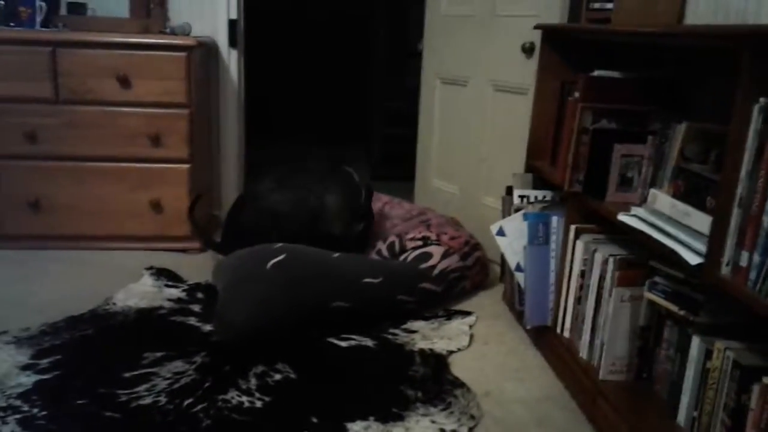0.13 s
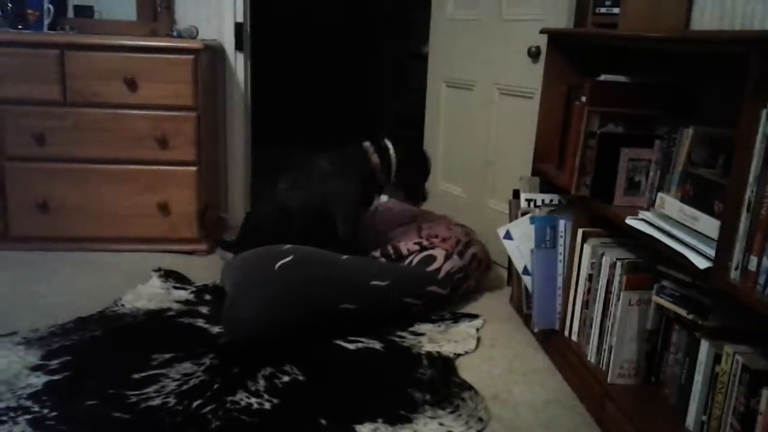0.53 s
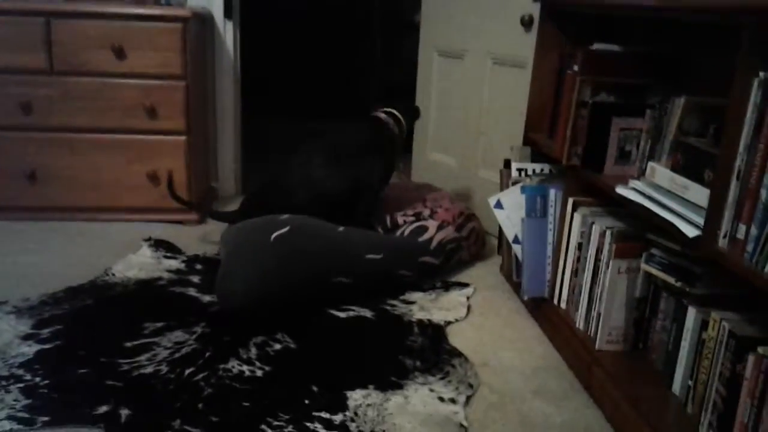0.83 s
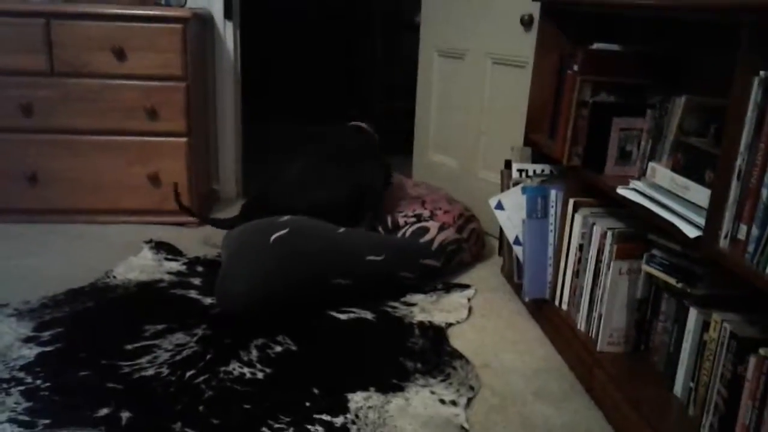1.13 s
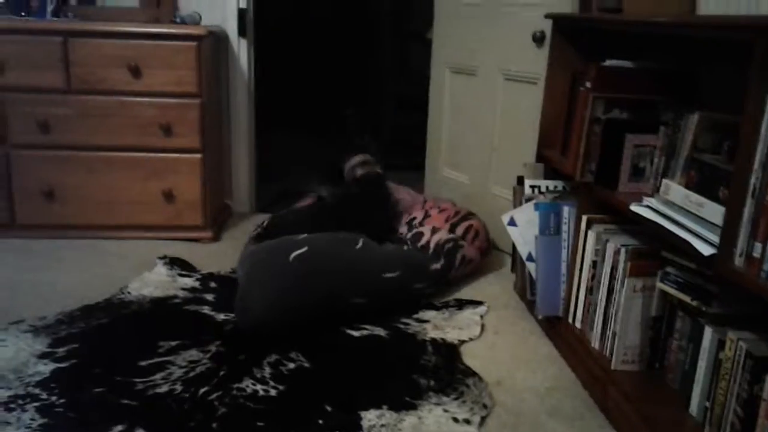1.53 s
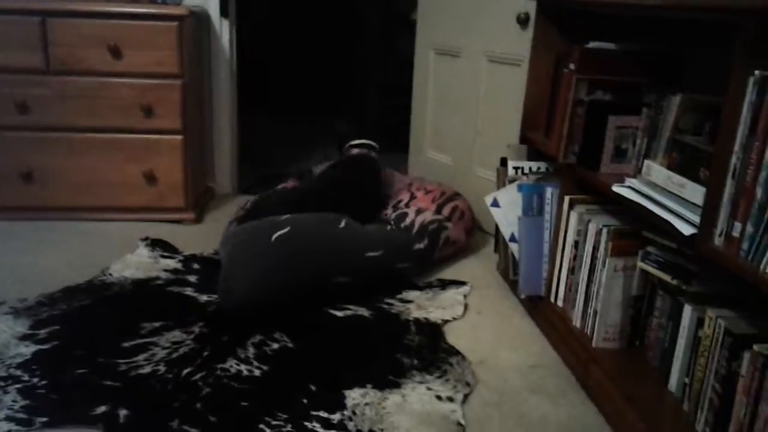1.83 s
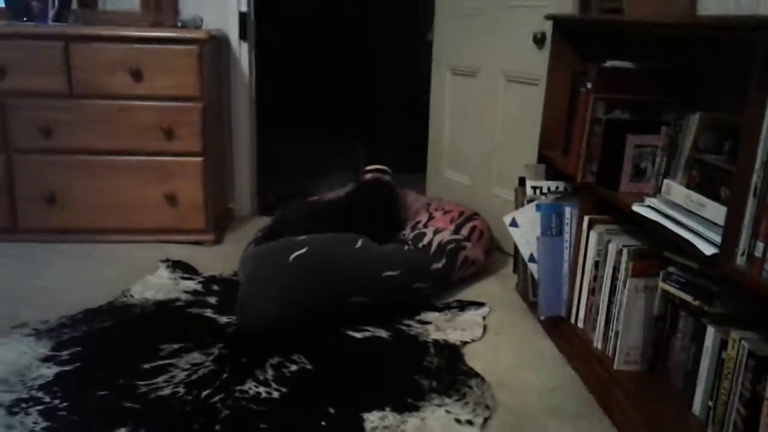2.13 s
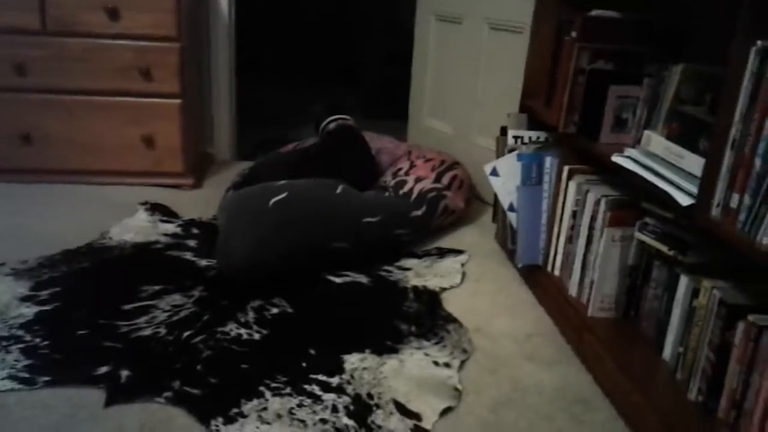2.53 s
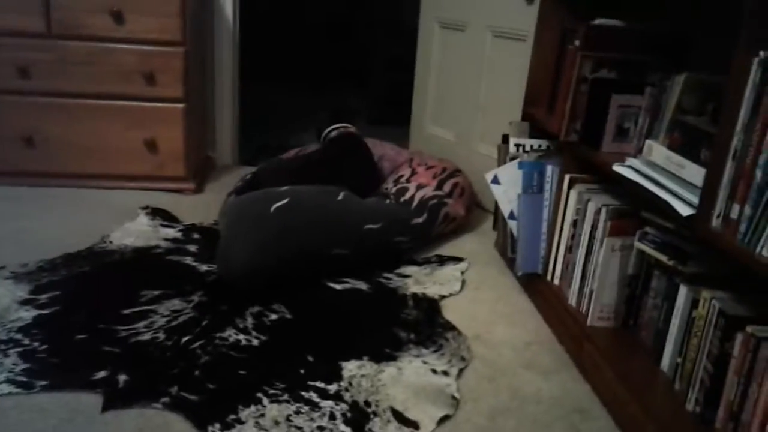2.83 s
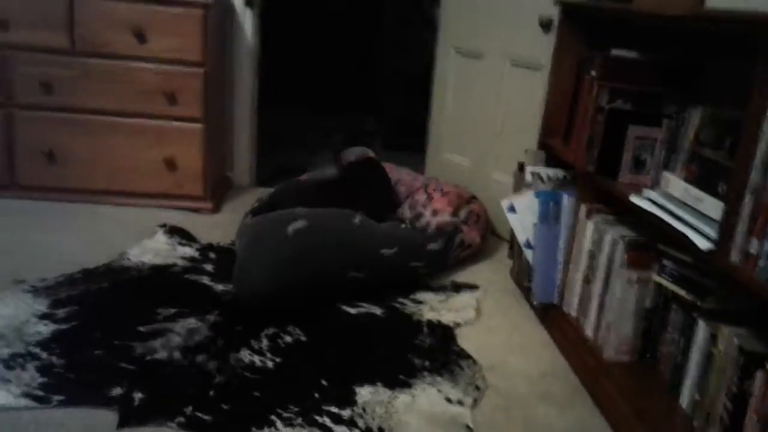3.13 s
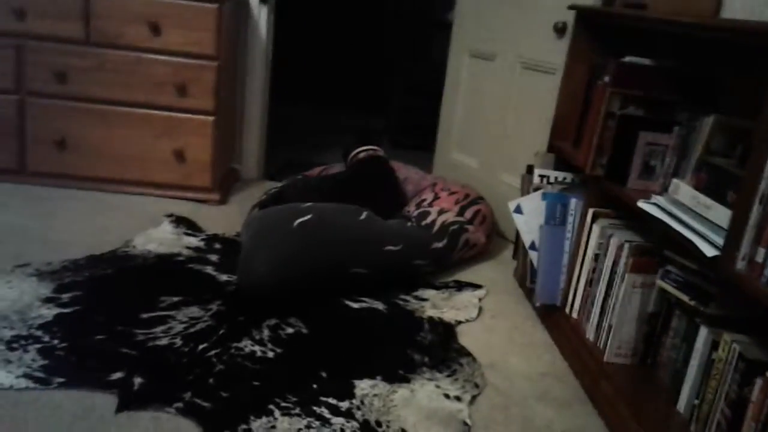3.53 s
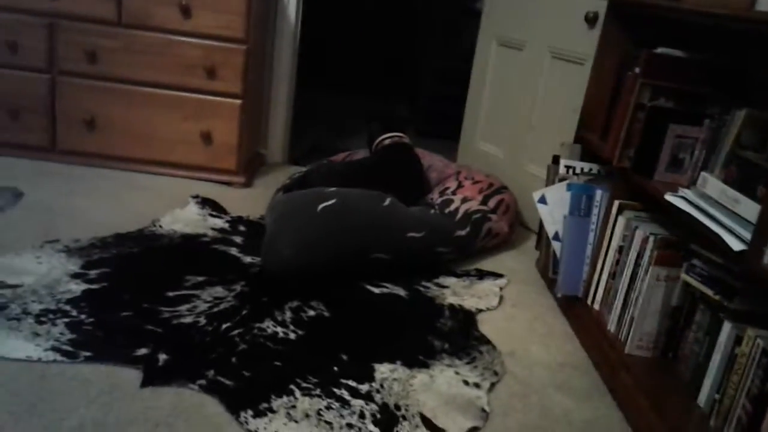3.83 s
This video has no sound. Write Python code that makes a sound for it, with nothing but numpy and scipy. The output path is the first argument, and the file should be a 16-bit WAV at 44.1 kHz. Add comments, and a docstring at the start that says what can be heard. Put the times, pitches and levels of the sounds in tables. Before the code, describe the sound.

Bright, hissing crunch of foam beads as a dog settles on a beanbag, then near silence

```python
"""Dog settling on a beanbag

A dog turns round on a beanbag and lies down, in a small quiet carpeted room. Thousands of foam beads slip
against each other and the cover: random impulses give a bright hiss while they slide, a dull crunch under
weight and low thuds as the body sinks in. Filtered noise gives a low boom in the room's bass modes.
After it settles come a small double tick and one short brush of fabric, over faint room noise and hum."""
import sys
import numpy as np
from scipy import signal
from scipy.fft import rfft, irfft, next_fast_len
from scipy.io import wavfile
from scipy.ndimage import map_coordinates

SR = 44100
rng = np.random.default_rng(int(sys.argv[2]) if len(sys.argv) > 2 else 0)


def waveform_to_disk(signal):
    """Save audio, clipped to [-1, 1], as 16-bit WAV at the path in sys.argv[1]."""
    frames = np.transpose(np.atleast_2d(signal))
    scaled = np.clip(frames, -1, 1) * 32767
    samples = np.round(scaled).astype(np.int16)
    wavfile.write(sys.argv[1], SR, samples)


N = 176400  # samples: 4 s


def amp(db):
    """Amplitude ratio: 20 dB is a factor of ten."""
    return 10 ** (np.asarray(db) / 20)


def unit(x):
    """Normalisation: scale to rms 1."""
    return x / np.sqrt(np.mean(x ** 2) + 1e-20)


def clock():
    """Sampling: the time of each sample in seconds."""
    return np.arange(N) / SR


def along(points, hz):
    """Logarithmic pitch scale: join (Hz, value) points by lines on a log axis."""
    point_hz, value = np.transpose(points)
    return np.interp(np.log(hz + 1), np.log(point_hz + 1), value)


def curve(rows):
    """Linear interpolation: join (s, value) points by lines."""
    return np.interp(clock(), *np.transpose(rows))


SETTLE_DB_PER_S = 28


def settling(rows):
    """Exponential decay: after its last point a level in dB falls at a steady rate."""
    since_last = np.maximum(clock() - rows[-1][0], 0)
    return curve(rows) - SETTLE_DB_PER_S * since_last


def wobble(rate):
    """Slow fluctuation: a smooth curve through random knots, rate knots a second."""
    knots = rng.standard_normal(int(N * rate / SR) + 4)
    return map_coordinates(knots, [clock() * rate])


def filtered(x, response):
    """Linear filtering: multiply the spectrum by a response of frequency."""
    padded = next_fast_len(N + SR // 2)
    gain = response(np.fft.rfftfreq(padded, 1 / SR))
    return irfft(rfft(x, padded) * gain, padded)[..., :N]


def coloured(x, spectrum):
    """Spectral shaping: weight x by a curve of (Hz, dB), then scale to rms 1."""
    return unit(filtered(x, lambda hz: amp(along(spectrum, hz))))


def noise(spectrum):
    """Coloured Gaussian noise: white noise shaped by a spectrum, at rms 1."""
    return coloured(rng.standard_normal(N), spectrum)


SLIP_SPREAD_DB = 3  # standard deviation of slip size


def slips(per_s):
    """Shot noise: random impulses of either sign and scattered size, with even mean power."""
    chance = np.clip(per_s / SR, .002, 1)  # of a slip in each sample
    hit = rng.random(N) < chance
    sign = np.sign(rng.standard_normal(N))
    size = amp(SLIP_SPREAD_DB * rng.standard_normal(N))
    return unit(hit * sign * size / np.sqrt(chance))


# Reverberation time of the room. Each row: frequency in Hz, time to fall 60 dB in seconds.
REVERB_TIMES = [(150, 0.62), (1500, 0.11), (10000, 0.29)]
TAIL_DB, TAIL_RENEW_S = -11, .4  # gain of the reverberation; time between fresh tails


def room(x):
    """Reverberation: direct sound plus a short decaying noise tail, crossfaded to a fresh one at intervals."""
    wet = np.zeros(N)
    for centre in np.arange(0, N / SR + TAIL_RENEW_S, TAIL_RENEW_S):
        hz, age, cells = signal.stft(rng.standard_normal(SR // 4), SR, nperseg=256)
        decay = amp(-60 * age / along(REVERB_TIMES, hz)[:, None])
        tail = signal.istft(cells * decay, SR, nperseg=256)[1]
        # equal-power crossfade between neighbouring tails
        share = np.sqrt(np.maximum(1 - np.abs(clock() - centre) / TAIL_RENEW_S, 0))
        wet += signal.oaconvolve(x * share, tail / np.linalg.norm(tail))[:N]
    return unit(x + amp(TAIL_DB) * wet)


# Sliding of the beads. Each row: time in seconds, level of the hiss in dB before trim.
SLIDE_LEVEL = [(0, -41.5), (.04, -44.5), (.15, -45.5), (.2, -49), (.27, -46.5), (.57, -41), (.65, -44),
               (.93, -45), (1.02, -38.5), (1.05, -41.5), (1.11, -36), (1.28, -41), (1.43, -37.5),
               (1.61, -46.5), (1.69, -40.5), (1.96, -49.5), (2.04, -46.5), (2.12, -44.5), (2.32, -58),
               (2.4, -46), (2.45, -52), (2.5, -63.5), (2.56, -63.5), (2.65, -60.5), (2.68, -54.5),
               (2.73, -54.5), (2.78, -61.5), (2.805, -73), (3.2, -86)]
# Colour of sliding beads. Each row: frequency in Hz, relative density in dB per Hz.
HISS_COLOUR = [(150, -42), (900, -11), (2000, -8), (2700, -10.5), (3600, -6), (4300, -7), (5200, -12),
               (6000, -8), (7100, -2), (8700, 0.5), (10200, -2.5), (11500, -6.5), (13000, -10),
               (14400, -12), (15500, -12.5)]
# Highest treble relative to the rest of the hiss. Each row: time in seconds, gain in dB.
AIR_GAIN = [(0, 0), (.4, 0.5), (1, 2.5), (1.3, -2), (1.55, 6), (1.75, -1.5), (2.1, 4), (2.3, 3),
            (2.6, -0.5), (3, 0)]
AIR_HZ = 10900  # where the highest treble begins
SLIPS_PER_S, FULL_SLIDE_DB = 36000, -38  # slip rate when the level equals a full slide
CROWDING = .45  # exponent: how the rate follows the amplitude
HISS_TRIM_DB = 0.5
CLUMP_DB, CLUMP_HZ = 0.64, 150.3  # small avalanches: depth and rate


def sliding_beads():
    """Stick-slip friction: faster sliding makes more and stronger slips; the top of the hiss comes and goes."""
    level_db = settling(SLIDE_LEVEL)
    rate = SLIPS_PER_S * amp(CROWDING * (level_db - FULL_SLIDE_DB))
    hiss = coloured(room(slips(rate)), HISS_COLOUR)
    top = filtered(hiss, lambda hz: 1 - 1 / (1 + (hz / AIR_HZ) ** 10))
    aired = hiss + (amp(curve(AIR_GAIN)) - 1) * top
    avalanches_db = CLUMP_DB * wobble(CLUMP_HZ)
    return amp(HISS_TRIM_DB + level_db + avalanches_db) * aired


# Pressing of the filling. Each row: time in seconds, level of the crunch in dB before trim.
PRESS_LEVEL = [(0.0, -48), (0.03, -56.5), (0.12, -49), (0.23, -59), (0.45, -53), (0.48, -50.5), (0.58, -52),
               (0.6, -47), (0.78, -54.5), (0.93, -49), (1.06, -50.5), (1.11, -43), (1.26, -52), (1.41, -48),
               (1.58, -55.5), (1.7, -46.5), (1.8, -56.5), (1.89, -54), (1.92, -59.5), (2.17, -53.5),
               (2.33, -65), (2.38, -54.5), (2.44, -55), (2.52, -71), (2.74, -67.5), (2.82, -79.5),
               (2.96, -86), (3.0, -82)]
# Colour of pressed beads. Each row: frequency in Hz, relative density in dB per Hz.
CRUNCH_COLOUR = [(40, -37), (200, -12.5), (480, -3.5), (600, 2), (750, -1.5), (1000, -1), (1350, -1.1),
                 (1900, -6), (2650, -13), (3100, -12.5), (3600, -5.5), (4300, -9), (5200, -13), (7500, -10),
                 (16000, -41)]
CRUNCH_SLIPS_PER_S, CRUNCH_TRIM_DB = 8000, 2
CRUNCH_CLUMP_DB, CRUNCH_CLUMP_HZ = 1, 49.76  # clumping: depth and rate


def pressed_beads():
    """Granular yielding: beads deep in the bag give way in muffled clumps."""
    clumps_db = CRUNCH_CLUMP_DB * wobble(CRUNCH_CLUMP_HZ)
    level_db = CRUNCH_TRIM_DB + settling(PRESS_LEVEL) + clumps_db
    return amp(level_db) * coloured(room(slips(CRUNCH_SLIPS_PER_S)), CRUNCH_COLOUR)


# Paws and body sinking into the bag. Each row: time in seconds, level of the thuds in dB before trim.
SINK_LEVEL = [(0.0, -61), (0.03, -62), (0.16, -50.5), (0.23, -57), (0.35, -63), (0.44, -53.5), (0.65, -52),
              (0.73, -59.5), (1.14, -50.5), (1.28, -61), (1.39, -49.5), (1.44, -58), (1.57, -58),
              (1.61, -68), (1.65, -55), (2.02, -61), (2.06, -58.5), (2.33, -64), (2.37, -54), (2.41, -57.5),
              (2.52, -76.5), (2.75, -69), (2.87, -89), (2.9, -83)]
# Colour of the thuds. Each row: frequency in Hz, relative density in dB per Hz.
THUD_COLOUR = [(40, -48), (120, -12.5), (190, -4.5), (215, 1.5), (280, 1.5), (360, -2), (435, -1),
               (500, -9.5), (900, -34), (3000, -61)]
THUD_SLIPS_PER_S, THUD_TRIM_DB = 5000, -0.1


def thuds():
    """Bulk displacement: weight sinking in shoves whole pockets of filling aside."""
    return amp(THUD_TRIM_DB + settling(SINK_LEVEL)) * coloured(slips(THUD_SLIPS_PER_S), THUD_COLOUR)


# The animal's weight heaving the bag. Each row: time in seconds, level of the boom in dB.
HEAVE_LEVEL = [(0, -59.5), (.55, -64), (.7, -58.5), (1.15, -58.5), (1.6, -59.5), (2.1, -61), (2.42, -66),
               (2.55, -70), (2.75, -70), (2.88, -82), (3.2, -81)]
# Bass modes of the room. Each row: frequency in Hz, full width at half amplitude in Hz,
# relative level in dB before the bass cut.
BASS_MODES = [(59.7, 9, -7.5), (78.4, 13, 2), (101, 9, -8), (117.3, 15, -1.5), (152.7, 22.4, -4)]
BASS_CUT_HZ = 66


def boom():
    """Modal resonance: the heaving bag stirs the room's bass modes."""
    def modes(f):
        peaks = sum(amp(db) / (1 + ((f - hz) * 2 / width) ** 2) for hz, width, db in BASS_MODES)
        bass_cut = f ** 4 / (f ** 4 + BASS_CUT_HZ ** 4)
        return peaks * bass_cut
    return amp(settling(HEAVE_LEVEL)) * unit(filtered(rng.standard_normal(N), modes))


# Background noise. Each row: frequency in Hz, relative density in dB per Hz.
FLOOR_COLOUR = [(20, -8), (45, -1.5), (100, -4), (150, -6), (230, -11), (320, -11), (500, -13.5),
                (1000, -19), (2000, -27.5), (4000, -22), (6000, -25.5), (9000, -28), (12000, -30),
                (16000, -31)]
FLOOR_DB = -76
# Faint room hum. Each row: frequency in Hz, rms level in dB.
HUM_TONES = [(80.5, -79), (116, -86.5)]
HUM_WAVER = 0.52  # radians of phase
# Colour of a faint midrange hiss. Each row: frequency in Hz, relative density in dB per Hz.
MID_HISS_COLOUR = [(700, -22), (1300, -4), (1600, 1.5), (2300, 2), (3000, -8), (6000, -38)]
# Level of that hiss. Each row: time in seconds, level in dB.
MID_HISS_DB = [(2.9, -95), (3.2, -85), (3.55, -82), (4, -81.5)]


def background():
    """Superposition: steady room noise, hum tones of wavering phase and a faint midrange hiss add together."""
    hum = np.zeros(N)
    for hz, db in HUM_TONES:
        phase = 2 * np.pi * hz * clock() + HUM_WAVER * wobble(4.4)
        hum += amp(db) * np.sqrt(2) * np.sin(phase)
    floor = amp(FLOOR_DB) * noise(FLOOR_COLOUR)
    mid_hiss = amp(curve(MID_HISS_DB)) * noise(MID_HISS_COLOUR)
    return floor + hum + mid_hiss


# The two ticks. Each row: start in seconds, starting level in dB.
TICK_ONSETS = [(3.282, -52), (3.2864, -58)]
# Colour of the ticks. Each row: frequency in Hz, relative density in dB per Hz.
TICK_COLOUR = [(100, -3), (600, 3), (1500, 2), (2800, -4), (4300, 5), (6000, -4), (9000, 0), (11000, -10),
               (16000, -12)]
TICK_T60_S = 0.013  # time to fall 60 dB


def ticks():
    """Damped transient: a small dry double tick, each a sudden noise burst with exponential decay."""
    t = clock()
    envelope = sum((t >= start) * amp(db - 60 * np.abs(t - start) / TICK_T60_S) for start, db in TICK_ONSETS)
    return envelope * noise(TICK_COLOUR)


# Colour of the brush. Each row: frequency in Hz, relative density in dB per Hz.
BRUSH_COLOUR = [(40, -14), (130, -2), (250, -5.5), (700, -10.5), (2000, -13.5), (3100, -11), (4500, -2.5),
                (5700, -9), (7000, -3), (9500, 2), (10300, -3), (11200, -14), (14000, -15), (16000, -19)]
BRUSH_PEAK_S, BRUSH_RISE_S, BRUSH_FALL_S = 3.3232, .0056, .0085
BRUSH_DB, BRUSH_SLIPS_PER_S = -47, 35000  # level at the peak; slip rate


def brush():
    """Friction noise: one quick rub of fabric, dense slips that swell and die."""
    t = clock() - BRUSH_PEAK_S
    scaled = t / np.where(t < 0, BRUSH_RISE_S, BRUSH_FALL_S)
    swell = np.exp(-.7 * np.abs(scaled) ** 1.65)
    return amp(BRUSH_DB) * swell * coloured(slips(BRUSH_SLIPS_PER_S), BRUSH_COLOUR)


def scene():
    """Superposition: all sources add at one microphone, which feeds both channels."""
    bag = sliding_beads() + pressed_beads() + thuds() + boom()
    mono = bag + background() + ticks() + brush()
    return np.array([mono, mono])


TOP_HZ = 15800


def record(dry):
    """Band limiting: nothing at or above the top frequency is kept."""
    return filtered(dry, lambda hz: hz < TOP_HZ)


dry = scene()
out = record(dry)
waveform_to_disk(out)
```